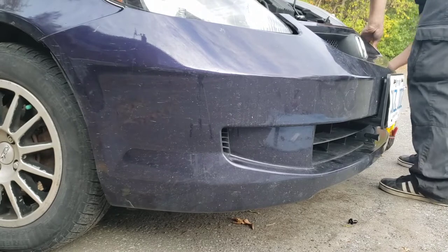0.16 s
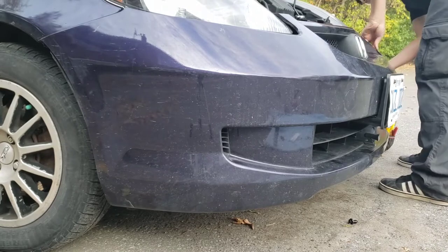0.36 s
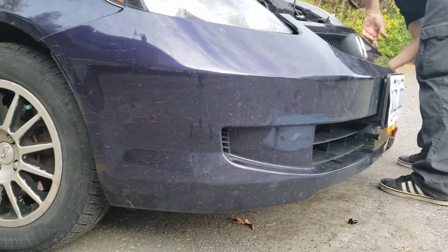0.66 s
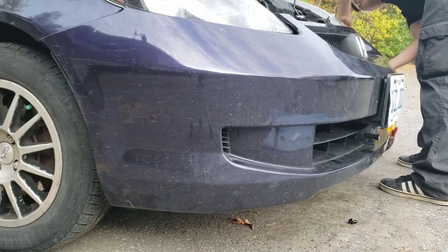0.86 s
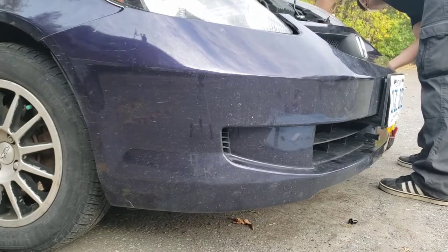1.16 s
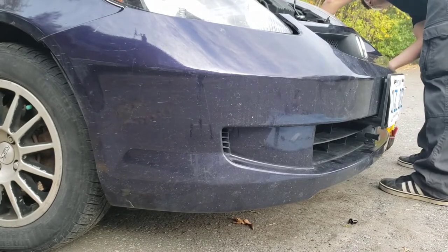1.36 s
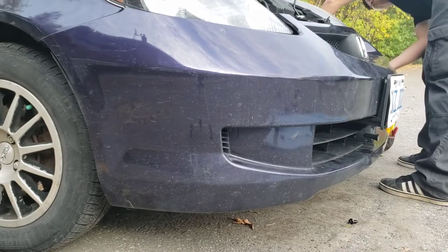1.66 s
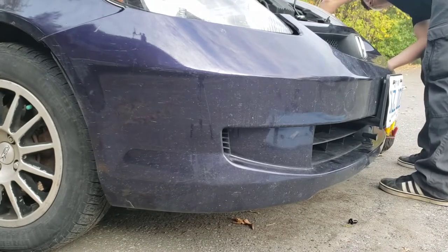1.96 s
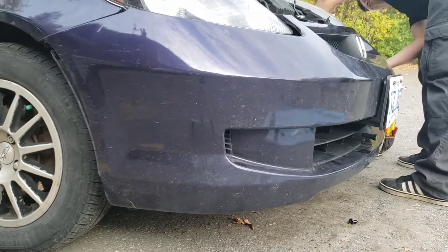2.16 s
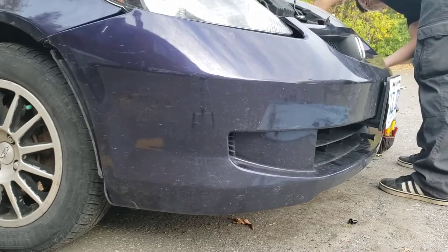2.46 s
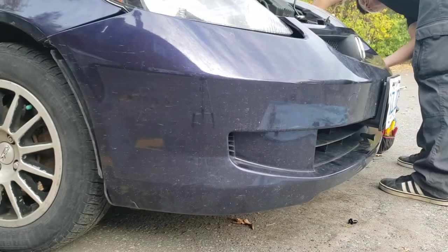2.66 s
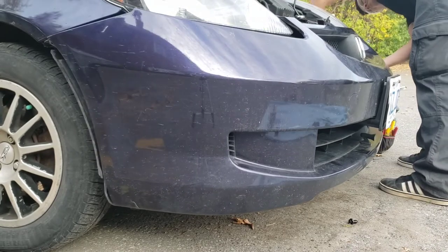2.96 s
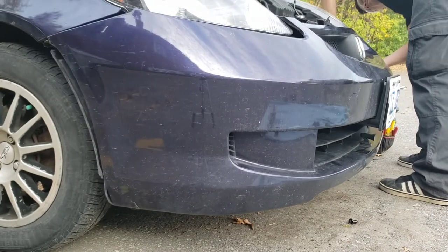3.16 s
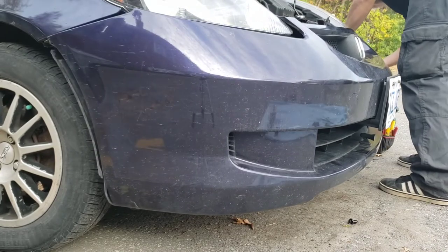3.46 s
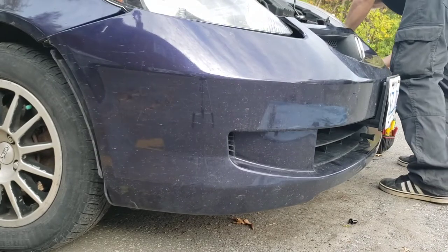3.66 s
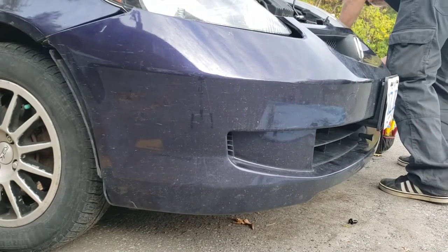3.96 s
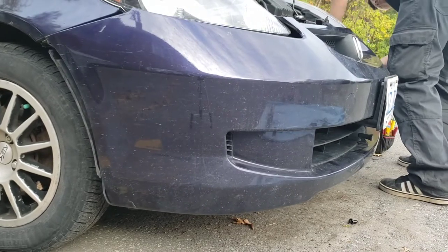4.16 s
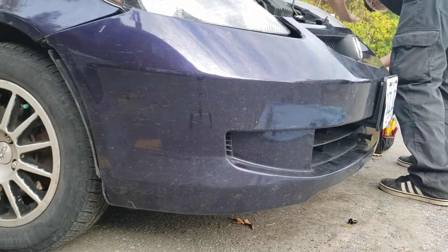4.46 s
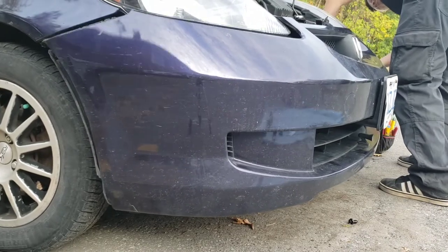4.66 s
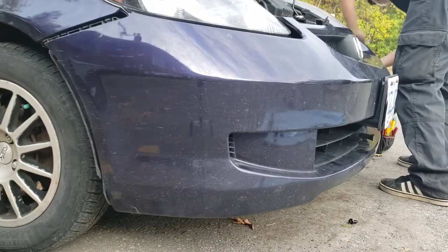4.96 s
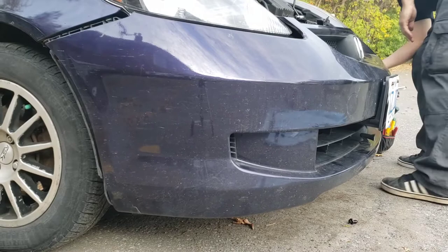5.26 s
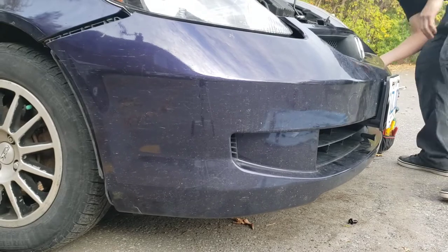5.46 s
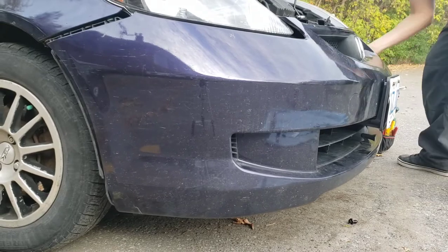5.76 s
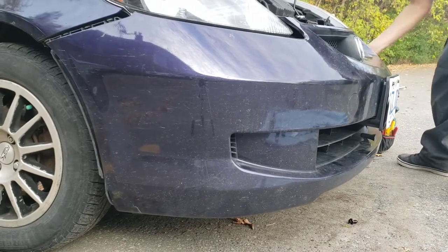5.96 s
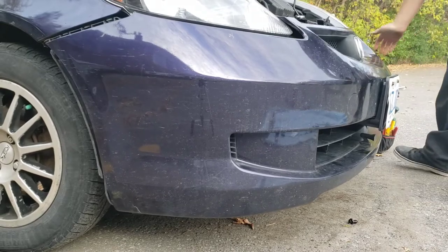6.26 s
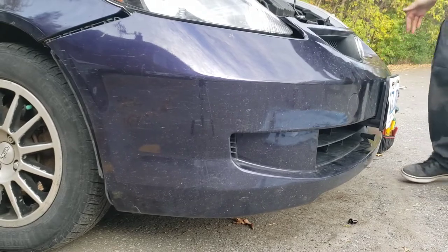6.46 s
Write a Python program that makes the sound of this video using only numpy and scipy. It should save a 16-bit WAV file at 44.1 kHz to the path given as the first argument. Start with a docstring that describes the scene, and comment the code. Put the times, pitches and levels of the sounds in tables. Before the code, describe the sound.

A steel car hood is lowered and knocks lightly against its latch several times, its hinges rubbing softly. It is lifted, dropped with a metallic clunk, then slammed shut with a loud ringing thump and a sharp latch snap. Faint clothing rustle and small gritty ticks follow. The hood is close to the microphone, outdoors, with soft open air and an engine idling faintly some way off.

```python
"""A car's steel hood is lowered outdoors, knocks on its latch, is lifted, dropped, then slammed shut.
Each contact rings the panel, thumps the body and clinks the latch; hardness sets the shares.
Hinges rub, clothes rustle, catch and grit tick. Behind: open air and an engine idling some way off.
The slam makes the recorder's gain control turn everything down."""
import sys
import numpy as np
from scipy import signal
from scipy.fft import rfft, irfft, next_fast_len
from scipy.io import wavfile

SR = 44100
rng = np.random.default_rng(int(sys.argv[2]) if len(sys.argv) > 2 else 0)


def log_audio(samples):
    """Write samples as a 16-bit WAV file to the path given in sys.argv[1]."""
    # one column per channel
    frames = np.atleast_2d(samples).T
    # limit to full scale, then quantise
    limited = np.clip(frames, -1, 1)
    pcm = np.round(limited * 32767).astype(np.int16)
    wavfile.write(sys.argv[1], SR, pcm)


N = 291501
TIME_S = np.arange(N) / SR
RING_S = TIME_S[:int(.8 * SR)]
HOOD_LAG_S, AMBIENT_LAG_S = .0001, .00029  # left port behind right
YARD_T60_S = .71

# two microphone ports: (frequency [Hz], left-right correlation [0..1])
PORT_LIKENESS = [(60, .993), (300, .93), (700, .72), (1500, .6), (3000, .45), (15000, .4)]
# port balance: (frequency [Hz], left minus right [dB])
PORT_LEAN = [(60, .2), (300, .8), (700, 1.8), (1300, .5), (2400, 1.4), (4400, -1.2), (8000, -1.5),
             (15000, -3)]
# noise spectra: (frequency [Hz], relative density [dB])
AIR_SPECTRUM = [(60, -0.5), (300, -3.5), (800, -1.5), (1300, -4.5), (2000, -9), (2800, -20), (3700, -17),
                (4700, -28), (6300, -41.5), (8200, -55), (12500, -41.5), (16000, -47)]
RUMBLE_SPECTRUM = [(20, -29), (33, 6.5), (42, -9.5), (55, -0.5), (76, 2.5), (100, -2.5), (160, -9.5),
                   (240, -10), (400, -25.5), (1000, -75.5)]
CLOTH_SPECTRUM = [(300, 5), (1500, 1.5), (3800, 8.5), (6000, 1.5), (8200, -12), (10000, -5.5), (12700, 2.5),
                  (16000, -8.5)]
HINGE_SPECTRUM = [(120, -10), (280, -5.5), (450, -5.5), (670, -1), (1000, -11), (1600, -13), (3000, -27.5),
                  (5000, -36), (8000, -58.5), (16000, -62.5)]
LATCH_SPECTRUM = [(400, -29), (1500, -6), (3500, 9.5), (6000, 2.5), (8200, -12.5), (10500, -10),
                  (13000, -1.5), (16000, -8)]
PANEL_SPECTRUM = [(40, -21), (110, -6.5), (270, 3), (600, -2.5), (1300, -6.5), (2200, -9), (3600, -13),
                  (5500, -10), (8000, -49), (16000, -38)]
# outdoor air: (time [s], level [dB])
AIR_LEVELS = [(0, -47.5), (1.2, -45), (4.3, -46.5), (6.6, -45)]
# idle hum: (order [x shaft rate], amplitude [dB])
IDLE_ORDERS = [(2, -47), (4, -47), (5, -47), (6, -48), (7, -49), (8, -56.5), (10, -60.5)]
# sleeves and trousers: (peak time [s], level [dB], rise [dB/s])
CLOTH_SWISHES = [(.13, -57, 8), (.56, -67.5, 60), (1.07, -59.5, 400), (3.42, -67.5, 110),
                 (3.91, -62.5, 300), (5.58, -51, 67), (6.25, -50, 91)]
# catch and grit underfoot: (time [s], level [dB], hardness [Hz])
SMALL_TICKS = [(0.028, -46.5, 5460), (1.055, -56.5, 5000), (3.906, -53, 9000), (4.186, -60, 5000),
               (5.558, -41, 9000), (5.576, -40, 13700), (5.589, -43, 14000), (6.117, -50, 13000),
               (6.156, -54, 13000), (6.245, -41, 6000), (6.335, -52, 6000)]
# hood on its hinges: (start [s], end [s], rub [dB], note [dB], start pitch [Hz], end pitch [Hz])
HINGE_SWINGS = [(2.19, 2.967, -43, -47.5, 685, 623.6), (3.213, 3.758, -44, -46, 773, 785)]
# steel panel: (frequency [Hz], level [dB], t60 [s])
STEEL_MODES = [(186, -13, .2), (219, -17, .22), (250, -15, .2), (286, -9, .26), (357, -11, .2),
               (451, -7, .18), (490, -16, .17), (572, -15, .16), (606, -15, .19), (700, -20, .23),
               (834, -12, .2), (917, -11, .19), (1195, -20, .22), (1316, -14, .2), (1380, -18, .16),
               (1527, -15, .22), (1694, -19, .2), (1817, -18, .17), (1966, -16, .2), (2104, -19, .2),
               (2429, -19, .2), (2922, -24, .2), (3388, -19, .17)]
# car body on springs and mounts: (frequency [Hz], level [dB], t60 [s])
CAR_BODY_MODES = [(52.1, -3, 0.32), (76, -6.5, 0.45), (90.3, -27, 0.72), (146, 5, 0.096)]
# dense small panel modes: (frequency [Hz], t60 [s])
PANEL_DECAY = [(100, 0.24), (400, 0.1), (1500, 0.12), (5000, 0.057), (14000, 0.067)]
# light hood knocks: (time [s], level [dB], hardness [Hz])
HOOD_KNOCKS = [(1.376, -38, 368), (1.615, -27, 1500), (1.639, -27.5, 2500), (2.163, -29, 330),
               (2.197, -21.5, 1320), (2.303, -21, 2330), (2.306, -16, 230), (2.415, -32, 970),
               (2.925, -33, 362), (3.020, -35.5, 900), (3.243, -32.5, 650), (3.513, -33, 1200),
               (3.744, -33, 1300), (5.793, -34, 380)]
# latch snapping over: (time [s], level [dB], hardness [Hz])
LATCH_SNAPS = [(1.638, -46, 6030), (2.232, -47, 13000), (2.249, -50, 14000), (3.51, -46.5, 12000),
               (3.792, -36.5, 8500), (3.809, -41.5, 8000), (4.651, -19.5, 14000), (4.662, -18, 12140),
               (4.671, -23, 14000), (4.682, -27.5, 14000)]
# drop, then slam: (time [s], level [dB], hardness [Hz], extra ring [dB], extra thump [dB],
# sink [dB re hit], rebound delay [s], rebound [dB re hit], rebound hardness [Hz])
HOOD_LANDINGS = [(3.796, -17.5, 1560, 0, -11, 0, 0.017, -8, 800),
                 (4.650, -8.5, 3960, 15, 13.5, -18.5, .034, -4.5, 4100)]
# first touches of a landing: (lead [s], level [dB re hit], hardness [x hit])
FIRST_TOUCHES = [(.008, -11, 0.41), (0.003046, -2.5, 0.74)]


def from_db(db):
    """Decibels to gain."""
    return 10 ** (np.asarray(db) / 20)


def unit_rms(x):
    """Scale to rms 1."""
    return x / np.sqrt(np.mean(x ** 2) + 1e-20)


def at_hz(table, hz):
    """Interpolate on a log-frequency axis."""
    points_hz, values = np.transpose(table)
    return np.interp(np.log(np.maximum(hz, 1)), np.log(points_hz), values)


def add(track, time_s, sound):
    """Mix a sound in at a time."""
    start = int(time_s * SR)
    track[:, start:start + sound.shape[1]] += sound[:, :N - start]


def drift(rate_hz):
    """Low-passed random wander, rms 1."""
    hz = np.fft.rfftfreq(N, 1 / SR)
    return unit_rms(irfft(rfft(rng.standard_normal(N)) / (1 + (hz / rate_hz) ** 2), N))


def noise(spectrum, lag_s, size=N):
    """Coloured noise at both ports, rms 1; left lags."""
    padded = next_fast_len(size, real=True)
    hz = np.fft.rfftfreq(padded, 1 / SR)
    mid, side = rfft(rng.standard_normal((2, padded)))
    likeness, ports = at_hz(PORT_LIKENESS, hz), np.array([[1], [-1]])
    pair = np.sqrt(1 + likeness) * mid + np.sqrt(1 - likeness) * side * ports
    gain = from_db(at_hz(spectrum, hz) + ports * at_hz(PORT_LEAN, hz) / 2) * (hz > 20)
    delay = np.exp(-1j * np.pi * hz * lag_s * ports)
    return unit_rms(irfft(pair * gain * delay, padded)[:, :size])


def decay(t60_s):
    """Free decay after a blow."""
    return np.exp(-np.log(1000) * RING_S / t60_s)


def swell(start_s, end_s, rise_db_per_s, fall_db_per_s):
    """Movement envelope: rise, hold at 1 from start to end, fall."""
    before_s, after_s = np.maximum(start_s - TIME_S, 0), np.maximum(TIME_S - end_s, 0)
    return from_db(-rise_db_per_s * before_s - fall_db_per_s * after_s)


def soften(x, hard_hz, q):
    """Springy contact: resonant low-pass, hardness as cut-off."""
    w = 2 * SR * np.tan(np.pi * min(hard_hz, SR / 3) / SR)
    return signal.lfilter(*signal.bilinear([w * w], [1, w / q, w * w], SR), x)


def friction(spectrum, lag_s, grain_db, grain_hz):
    """Noise that catches and lets go many times a second."""
    return from_db(grain_db * drift(grain_hz)) * noise(spectrum, lag_s)


def air():
    """Open air: broad noise, slowly changing level."""
    level_db = np.interp(TIME_S, *np.transpose(AIR_LEVELS))
    return from_db(level_db) * noise(AIR_SPECTRUM, AMBIENT_LAG_S)


def engine(idle_hz=28.38, sag_hz_per_s=.08, rumble_db=-39, fade_db_per_s=.65):
    """Sagging idle: wavering low orders over a fading rumble."""
    shaft_hz = (idle_hz - sag_hz_per_s * TIME_S) * (1 + .0045 * drift(4.7))
    shaft_rad = 2 * np.pi * np.cumsum(shaft_hz) / SR
    hum = sum(from_db(db + 2.7 * drift(.9)) * np.sin(order * shaft_rad + rng.uniform(0, 2 * np.pi))
              for order, db in IDLE_ORDERS)
    return hum + from_db(rumble_db - fade_db_per_s * TIME_S) * noise(RUMBLE_SPECTRUM, AMBIENT_LAG_S)


def clothes():
    """Cloth slides on cloth, one swell per movement."""
    motion = sum(from_db(db) * swell(peak_s, peak_s, rise_db_per_s, fall_db_per_s=84)
                 for peak_s, db, rise_db_per_s in CLOTH_SWISHES)
    return motion * friction(CLOTH_SPECTRUM, HOOD_LAG_S, grain_db=2, grain_hz=130)


def ticks():
    """Catch and grit: tiny, dry, bright contacts."""
    out = np.zeros((2, N))
    for time_s, level_db, hard_hz in SMALL_TICKS:
        tick = noise(CLOTH_SPECTRUM, HOOD_LAG_S, size=len(RING_S)) * decay(t60_s=.044)
        add(out, time_s, from_db(level_db) * soften(tick, hard_hz, q=1.8))
    return out


def hinge_note(hz, width_hz):
    """Friction noise in one narrow, gliding resonance."""
    phase_rad = 2 * np.pi * np.cumsum(hz) / SR - 2 * np.pi * hz * np.array([[AMBIENT_LAG_S], [0]])
    return drift(width_hz) * np.cos(phase_rad) + drift(width_hz) * np.sin(phase_rad)


def hinges():
    """Hinges rub through each swing; the note glides with hood angle, loudest halfway."""
    out, rub = 0, friction(HINGE_SPECTRUM, AMBIENT_LAG_S, grain_db=1.2, grain_hz=15)
    for start_s, end_s, rub_db, note_db, start_hz, end_hz in HINGE_SWINGS:
        travel = np.clip((TIME_S - start_s) / (end_s - start_s), 0, 1)
        note = hinge_note(start_hz + (end_hz - start_hz) * travel, width_hz=60)
        out += from_db(rub_db) * swell(start_s, end_s, rise_db_per_s=160, fall_db_per_s=63.5) * rub
        out += from_db(note_db) * np.sin(np.pi * travel) * note
    return out


def latch_clink(yard_db=-29):
    """Short, bright latch ring with a faint yard tail."""
    envelope = decay(t60_s=.15) + from_db(yard_db) * decay(YARD_T60_S)
    return noise(LATCH_SPECTRUM, HOOD_LAG_S, size=len(RING_S)) * envelope


def struck_modes(table, spread_db):
    """Damped sines of alternating sign; higher ones differ more between ports."""
    hz, db, t60_s = np.transpose(table)[:, :, None]
    envelope = from_db(db + spread_db * rng.standard_normal(hz.shape)) * decay(t60_s)
    envelope[1::2] *= -1
    lean = from_db(at_hz(PORT_LEAN, hz) / 2)
    scatter_rad = np.sqrt(1 - at_hz(PORT_LIKENESS, hz)) * rng.standard_normal(hz.shape) / 2
    left = lean * np.sin(2 * np.pi * hz * np.maximum(RING_S - HOOD_LAG_S, 0) + scatter_rad)
    right = np.sin(2 * np.pi * hz * RING_S - scatter_rad) / lean
    return np.sum(envelope * [left, right], axis=1)


def panel_crash(build_s=.00021, yard_db=-22):
    """Dense small modes build as the wave crosses the sheet; lows ring longest."""
    out, rest = 0, noise(PANEL_SPECTRUM, HOOD_LAG_S, size=len(RING_S))
    yard = from_db(yard_db) * decay(YARD_T60_S)
    for top_hz in 125 * 2 ** np.arange(8):
        octave = signal.sosfiltfilt(signal.butter(2, top_hz, fs=SR, output="sos"), rest)
        rest = rest - octave
        out += octave * (decay(at_hz(PANEL_DECAY, top_hz / np.sqrt(2))) + yard)
    return out * (1 - np.exp(-RING_S / build_s))


def contact(level_db, hard_hz, extra_ring_db=0, extra_thump_db=0, metal_hz=2960):
    """One blow: panel crash and ring, body thump, latch clink. Harder clinks more."""
    octaves = np.log2(hard_hz / metal_hz)  # re metal-on-metal hardness
    ring = from_db(-9.5 + .5 * octaves + extra_ring_db) * struck_modes(STEEL_MODES, spread_db=0)
    sheet = soften(panel_crash() + ring, hard_hz, q=max(.71 - .18 * octaves, .5))
    thump = from_db(-15.5 + extra_thump_db) * struck_modes(CAR_BODY_MODES, spread_db=4.5)
    clink = from_db(-17.5 + 10 * octaves) * soften(latch_clink(), 6.6 * hard_hz, q=.87)
    return from_db(level_db) * (sheet + thump + clink)


def hood(scrape_s=2.219, slip_s=.015, stops_delay_s=.00595, stops_hz=260, pressed_ring_db=-9.5):
    """Knocks, catch scrape, two landings (touch, hit, sink into rubber stops, rebound), latch snaps."""
    out = np.zeros((2, N))
    for time_s, level_db, hard_hz in HOOD_KNOCKS:
        add(out, time_s, contact(level_db, hard_hz))
    for slip, jitter in enumerate(rng.uniform(-.2, .2, size=5)):  # safety catch slips over its ramp
        add(out, scrape_s + slip_s * (slip + jitter), contact(level_db=-33.5, hard_hz=3680))
    for time_s, level_db, hard_hz, ring_db, thump_db, sink_db, *rebound in HOOD_LANDINGS:
        rebound_s, rebound_db, rebound_hz = rebound
        for lead_s, touch_db, share in FIRST_TOUCHES:
            add(out, time_s - lead_s, contact(level_db + touch_db, hard_hz * share, pressed_ring_db))
        add(out, time_s, contact(level_db, hard_hz, ring_db, thump_db))
        add(out, time_s + stops_delay_s, contact(level_db + sink_db, stops_hz, pressed_ring_db))
        add(out, time_s + rebound_s, contact(level_db + rebound_db, rebound_hz, pressed_ring_db))
    for time_s, level_db, hard_hz in LATCH_SNAPS:
        add(out, time_s, from_db(level_db) * soften(latch_clink(), hard_hz, q=1))
    return out


def scene():
    """Hood and handling over open air and idle."""
    return air() + hood() + ticks() + hinges() + clothes() + engine()


def gain_control(x, threshold_db, max_cut_db, release_db_per_s, attack_s):
    """Loud sound pulls the gain down fast; it creeps back."""
    pole = np.exp(-1 / (attack_s * SR))
    smoother = [1 - pole], [1, -pole]
    level_db = 10 * np.log10(signal.lfilter(*smoother, np.mean(x ** 2, axis=0)) + 1e-12)
    over_db = np.clip(level_db - threshold_db, 0, max_cut_db)
    held_db = np.maximum.accumulate(over_db + release_db_per_s * TIME_S) - release_db_per_s * TIME_S
    return x * from_db(-signal.lfilter(*smoother, held_db))


def record(dry, low_cut_hz=39, stopband_hz=17100):
    """Microphone bass cut, gain control, soft clip, steep low-pass."""
    heard = signal.sosfilt(signal.butter(4, low_cut_hz, "high", fs=SR, output="sos"), dry)
    levelled = gain_control(heard, threshold_db=-16, max_cut_db=6.5, release_db_per_s=.15, attack_s=.005)
    rounded = levelled / (1 + levelled ** 4) ** (1 / 4)
    return signal.sosfilt(signal.cheby2(20, 70, stopband_hz, fs=SR, output="sos"), rounded)


dry = scene()
out = record(dry)
log_audio(out)
```